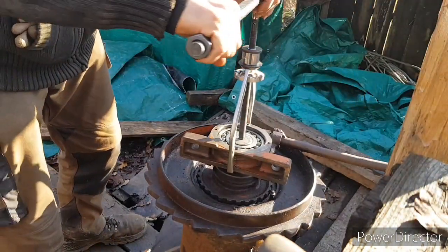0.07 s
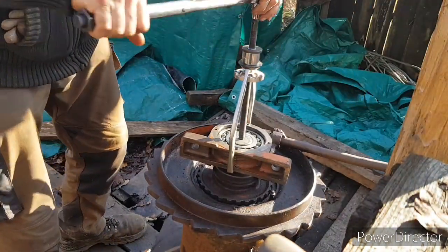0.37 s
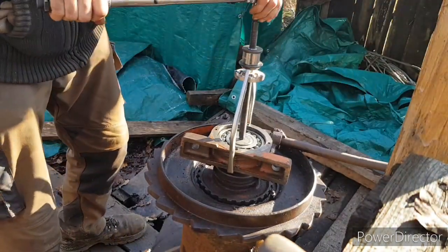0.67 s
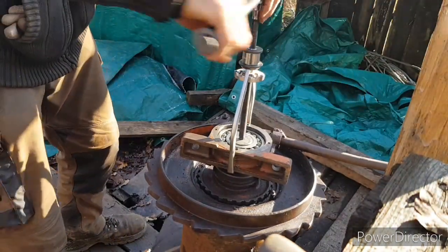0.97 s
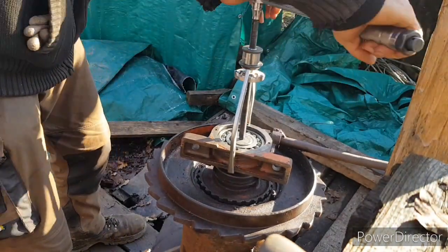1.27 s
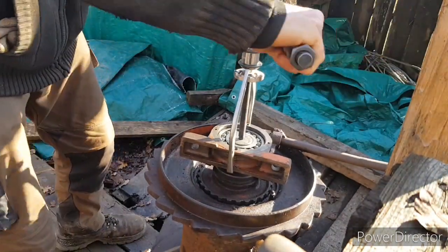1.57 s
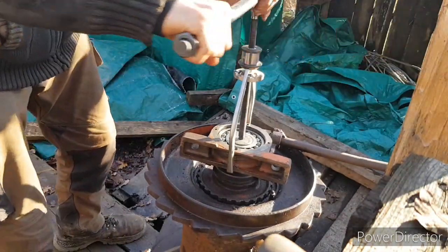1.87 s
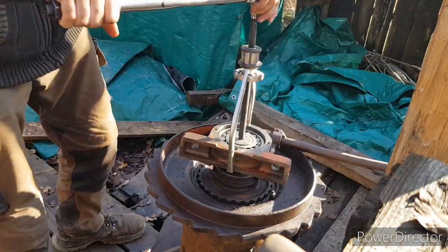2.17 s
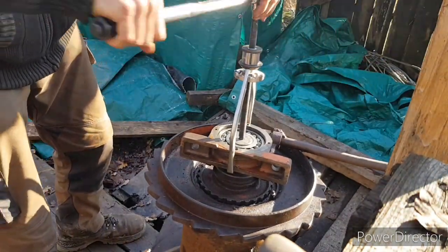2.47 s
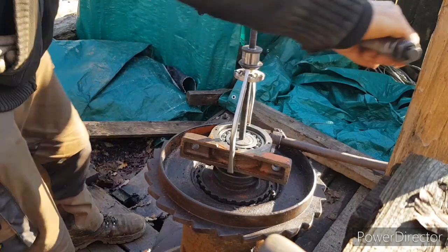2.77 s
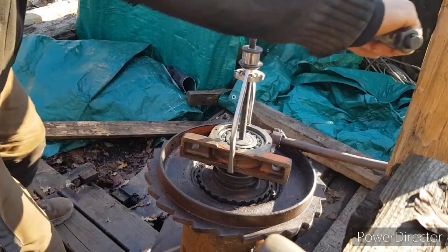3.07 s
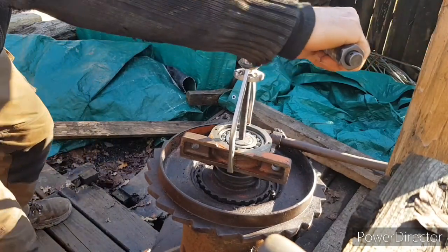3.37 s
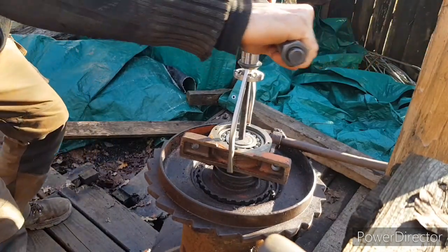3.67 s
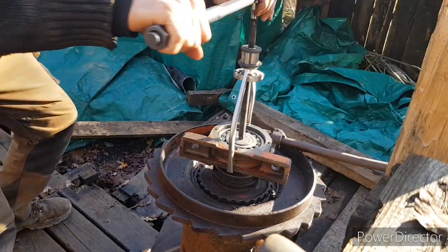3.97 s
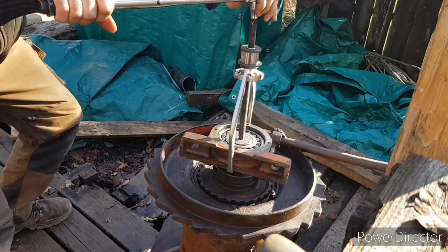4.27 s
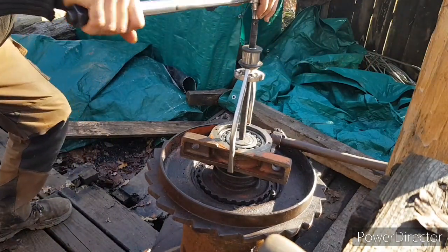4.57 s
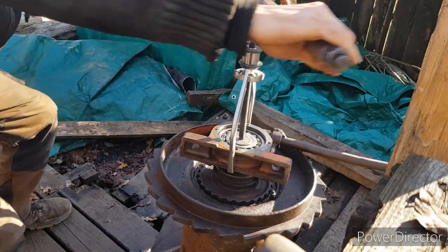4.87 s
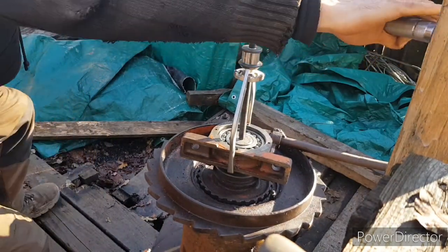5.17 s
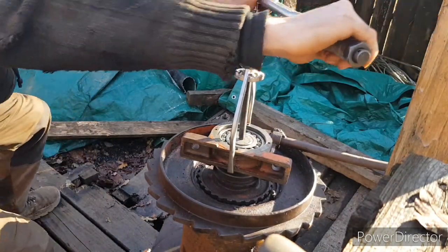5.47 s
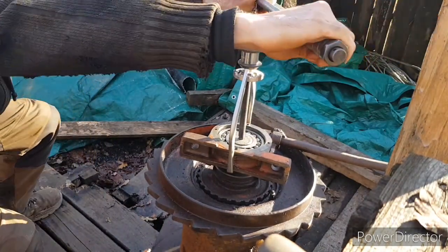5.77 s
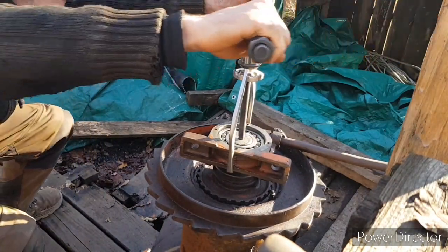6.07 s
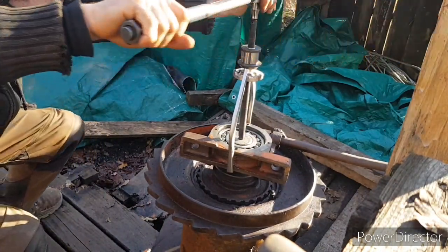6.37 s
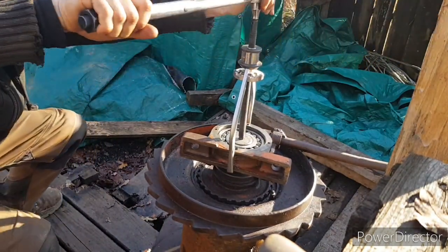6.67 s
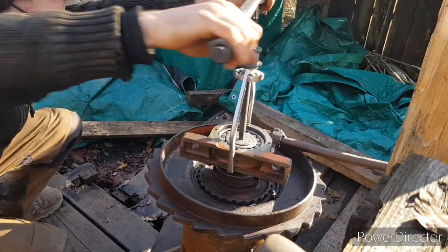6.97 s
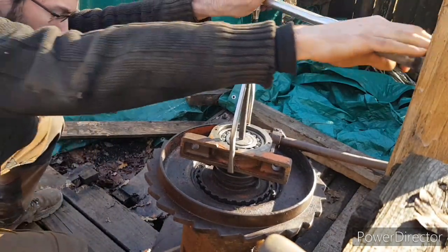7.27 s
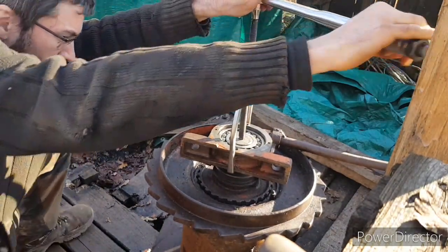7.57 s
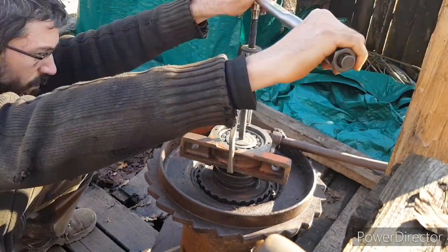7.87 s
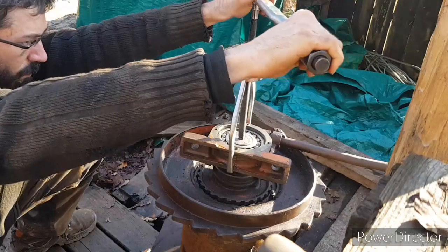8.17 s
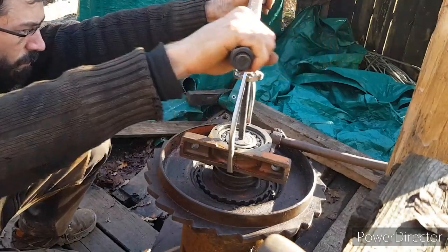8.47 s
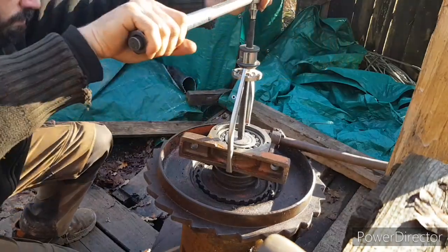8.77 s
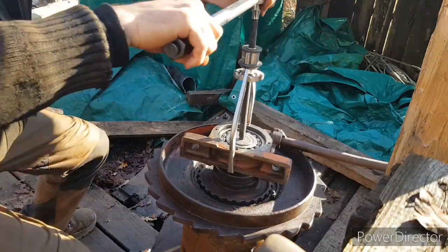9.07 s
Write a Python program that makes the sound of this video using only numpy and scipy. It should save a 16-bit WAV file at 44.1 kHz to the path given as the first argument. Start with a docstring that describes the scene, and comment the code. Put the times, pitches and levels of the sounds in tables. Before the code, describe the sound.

A long ratchet wrench turns a bearing puller on an iron wheel in a quiet yard. After a low thump on the plank deck, the wrench clicks sharply four times, then the wheel drops with a loud dull clunk, a rusty scrape and a soft ring. Three more bursts of clicks follow, about two seconds apart, among softer knocks, shoe scuffs and sleeve rustles. The sound is close and dry over a faint distant rumble.

```python
"""A long ratchet wrench turns a bearing puller on an iron wheel, on a plank deck in a fenced yard.
Over a faint far rumble, the wheel's rim sings softly, its stand thumps on the planks and boards tap.
Near 1 s slack steel ticks and the wrench swings back: its catch, the pawl, snaps over four teeth.
At 1.6 s the loaded wheel drops back with its loudest clunk, and rusty iron grates. Three more back
swings follow, near 2.6, 4.8 and 7.1 s, among softer knocks, scuffing shoes and rustling sleeves."""
import sys
import numpy as np
from scipy import signal
from scipy.fft import rfft, irfft, next_fast_len
from scipy.io import wavfile

SR = 44100
rng = np.random.default_rng(int(sys.argv[2]) if len(sys.argv) > 2 else 0)


def output_pcm(signal):
    """Save a mono or channel-first signal as 16-bit PCM at the path in sys.argv[1].

    Samples are clipped to [-1, 1] before scaling.
    """
    pcm = np.clip(np.atleast_2d(signal).T, -1, 1) * 32767
    wavfile.write(sys.argv[1], SR, np.round(pcm).astype(np.int16))


N = 401751


def undb(db):
    """Turn decibels into a number to multiply by."""
    return 10 ** (np.asarray(db) / 20)


def clock(seconds):
    """The time of each sample in a span."""
    return np.arange(int(seconds * SR)) / SR


def fade(t, t60):
    """Die away by 60 dB every t60 seconds (the fade time)."""
    return np.exp(-np.log(1000) * t / t60)


def unit(x, seconds):
    """Give a sound the energy of a steady level of 1 held for that long."""
    return x / np.sqrt(np.mean(np.sum(x ** 2, axis=-1)) / (seconds * SR))


def colour(x, points):
    """Shape the tone along (f/Hz, level/dB) points; the cepstrum step keeps it from sounding early."""
    size = 2 * next_fast_len(x.shape[-1] // 2 + 2048)
    hz, db = np.transpose(points)
    bin_hz = np.arange(size // 2 + 1) * SR / size
    curve_db = np.interp(np.log(bin_hz + 1), np.log(hz), db)
    cepstrum = irfft(np.log(undb(curve_db)))
    cepstrum[1:size // 2] *= 2
    cepstrum[size // 2 + 1:] = 0
    return irfft(rfft(x, size) * np.exp(rfft(cepstrum)))[..., :x.shape[-1]]


def low(x, hz, order=2):
    """Keep what lies below hz."""
    return signal.sosfilt(signal.butter(order, hz, fs=SR, output="sos"), x)


def high(x, hz, order=4):
    """Keep what lies above hz."""
    return signal.sosfilt(signal.butter(order, hz, "high", fs=SR, output="sos"), x)


def brighten(x, db):
    """Lift or lower everything above 8 kHz."""
    top = signal.sosfiltfilt(signal.butter(4, 8000, "high", fs=SR, output="sos"), x)
    return x + (undb(db) - 1) * top


def ring(notes, t, scatter_db, detune, spread):
    """A struck object's fading notes, mixed anew by each blow and a little out of step in each ear."""
    hz, db, t60 = np.transpose(notes)[:, :, None]
    size, tune, skew, travel = rng.standard_normal((4, len(notes), 1))
    loudness = undb(db + scatter_db * size) * fade(t, t60)
    phase = 2 * np.pi * (hz * (1 + detune * tune) * t + travel)
    return np.array([np.sum(loudness * np.sin(phase + side * spread * skew), axis=0) for side in (1, -1)])


def noise(count, width):
    """Stereo hiss; at width 0 both ears hear the same."""
    mid, side = rng.standard_normal((2, count))
    return np.array([mid + width * side, mid - width * side]) / np.hypot(1, width)


def pan(x, db):
    """Shift a sound to the left by db."""
    return x * undb(np.array([[db], [-db]]) / 2)


def add(out, s, x):
    """Mix a sound in at s seconds."""
    start = max(int(s * SR), 0)
    out[:, start:start + x.shape[1]] += x[:, :max(N - start, 0)]


# tone of the background: f/Hz, level/dB
AIR_TONE = [(12, -49.5), (20, -20), (46, -6.5), (65, -2), (110, -9), (228, -25.5), (301, -25), (337, -28),
            (434, -30), (718, -31.5), (976, -33.5), (2460, -35), (6720, -42), (14700, -38.5),
            (16000, -40.5)]
def air(level_db=-66, wander_db=-0.13):
    """A far rumble wavers very slightly, near the middle, under a smooth wide hiss."""
    mid, side = colour(rng.standard_normal((2, N)), AIR_TONE)
    side = colour(side, [(60, -12), (200, -5.5), (700, 0.5), (1500, 0.5)])
    wander = unit(low(rng.standard_normal(N), 5.9), N / SR)
    mid = mid + (undb(wander_db * wander) - 1) * low(mid, 300, order=1)
    return np.array([mid + side, mid - side]) * undb(level_db) / np.std(mid)


# the rim's two notes: f/Hz, fade time/s, wobble rate/Hz
RIM_NOTES = [(611, 2.6, 6.4), (666, 1.3, 10)]
def rim(opening_db=-71.5, clunk_db=-34.5, wobble=0.61, swing_pitch=1.022, detune=.007):
    """The rim sings at the start and at each snap and clunk; it is not quite round, so it wobbles."""
    out, t = np.zeros((2, N)), clock(2)
    snap_upper_db, clunk_upper_db = 4.5, 1.5  # hard snaps favour the upper note
    leaning = fade(t, 0.28)  # in a swing the wrench leans on the wheel: shorter, higher notes
    blows = [(0, opening_db, snap_upper_db, swing_pitch, leaning)]
    blows += [(s, db + clunk_db, clunk_upper_db, 1, 1) for s, db, _ in WHEEL_CLUNKS]
    for snaps, (_, _, rim_db) in zip(PAWL_SNAPS, BACK_SWINGS):
        for s, db, *_ in snaps:
            pitch = swing_pitch + detune * rng.standard_normal()
            blows.append((s, db + rim_db, snap_upper_db, pitch, leaning))
    rise = 1 - np.exp(-t / .02)  # the ring takes time to spread round the wheel
    notes = [(hz, rise * fade(t, t60) * (1 - wobble * np.cos(2 * np.pi * wobble_hz * t)))
             for hz, t60, wobble_hz in RIM_NOTES]
    for s, db, upper_db, pitch, damping in blows:
        lower, upper = (np.sin(2 * np.pi * hz * pitch * t) * shape for hz, shape in notes)
        song = (lower + undb(upper_db) * upper) * damping
        add(out, s, pan(unit(song, .1), 2) * undb(db))
    return out


# notes of the planks: f/Hz, level/dB, fade time/s
PLANK_NOTES = [(96.2, -7.5, 0.41), (130.6, -2, 0.2), (148.25, 0.5, 0.19), (203.8, -13, 0.26),
               (231.6, -2, 0.18), (254, -6, 0.077), (351.3, -11, .16), (449.4, -4.5, 0.1),
               (556.6, -6.5, .08), (700, -13.5, 0.042)]
# tone of rattling boards: f/Hz, level/dB
RATTLE_TONE = [(40, -27.5), (90, -8), (160, -1.5), (330, -5), (560, -3.5), (740, -4), (950, -12),
               (1500, -24), (12000, -51)]
# thumps on the deck: t/s, level/dB, muffled above f/Hz
DECK_THUMPS = [(0.0787, -32, 500), (.135, -46.5, 714), (1.615, -28.5, 448), (3.004, -57, 600),
               (3.098, -47.5, 700), (3.328, -39.5, 274), (3.378, -53.5, 350), (4.695, -39.5, 110),
               (5.624, -38, 293), (7.57, -43, 789), (7.789, -65, 600), (7.984, -40, 328), (9.025, -58, 299)]
def deck(rattle_db=-5, rattle_t60=0.28, gain_db=0.62):
    """The stand or a shoe lands on the planks; a softer landing leaves only the low notes."""
    out, t = np.zeros((2, N)), clock(.5)
    # the planks move most at first, while the load still presses
    push = (1 + undb(4) * fade(t, 0.042)) * (1 - np.exp(-t / 0.0011))
    for s, db, muffle_hz in DECK_THUMPS:
        planks = ring(PLANK_NOTES, t, scatter_db=-1.0, detune=0.0091, spread=0.15)
        rattle = colour(noise(len(t), width=0.27) * fade(t, rattle_t60), RATTLE_TONE)
        thump = low((unit(planks, 0.99) + undb(rattle_db) * unit(rattle, 1)) * push, muffle_hz)
        thump = high(thump, 85)  # the thumps carry hardly any deep bass
        add(out, s, unit(thump, .03) * undb(db + gain_db))
    return pan(out, 1.1)


# tone of a tap: f/Hz, level/dB
TAP_TONE = [(200, -9), (600, -1), (1200, -5.5), (2300, -0.5), (3100, -9), (4100, 1), (6000, -7.5),
            (14000, -30)]
# taps of boards and grit: t/s, level/dB, muffled above f/Hz
BOARD_TAPS = [(.082, -51, 1320), (0.132, -53, 2500), (.171, -57, 3100), (0.845, -60.5, 2980),
              (0.893, -60, 2530), (1.686, -46.5, 5030), (1.735, -55.5, 4020), (3.1, -53, 1530),
              (3.16, -60, 2260), (3.202, -66, 2230), (7.57, -40.5, 1010), (7.876, -64.5, 2400),
              (8.248, -50, 800), (8.709, -54, 2170)]
def taps(echo_db=-12, echo_t60=0.36, gain_db=-2):
    """Loose boards and grit tap dryly, each with a faint echo."""
    out, t = np.zeros((2, N)), clock(.2)
    shape = fade(t, .04) + undb(echo_db) * fade(t, echo_t60)
    for s, db, muffle_hz in BOARD_TAPS:
        burst = colour(noise(len(t), width=0.76) * shape, TAP_TONE)
        tap = low(burst, muffle_hz, order=3)
        add(out, s, unit(tap, .01) * undb(db + gain_db))
    return out


# tone of steel hitting steel: f/Hz, level/dB
STEEL_TONE = [(300, -41.5), (1100, -27.5), (1600, -22), (2300, -4.5), (3200, -5), (4100, -5.5), (5500, -5),
              (6800, -7), (8050, -17), (9400, -1.5), (12200, -2.5), (14200, -7.5), (16000, -24)]
# notes of the wrench's head: f/Hz, level/dB, fade time/s
HEAD_NOTES = [(2578, -6, .012), (3140, -1.5, 0.022), (3772, -5.5, 0.0092), (5020, -1, .014),
              (5880, 1, 0.012), (9440, -0.5, 0.014), (10670, 1.5, 0.012), (11830, -1, 0.014),
              (12100, 4, .01), (13500, -2, .007)]
SLIDE_S = .004  # the slide before each hit
def snap(treble_db, pan_db, sharp_db, ring_db=0, slide_t60=.005, crack_t60=.0105):
    """Steel slides, then hits steel: tiny bounces make a crack and the greased head rings briefly."""
    t = clock(.3) - SLIDE_S
    early = t[t < .03]
    before, after = np.maximum(-early, 0), np.maximum(early, 0)
    shape = fade(before, slide_t60) * fade(after, crack_t60)
    crack = colour(noise(len(early), width=0.92) * shape, STEEL_TONE)
    head = ring(HEAD_NOTES, after, scatter_db=3, detune=.012, spread=.7)
    head = high(head * (early > 0), 2000)
    direct = unit(crack, 1) + undb(ring_db) * unit(head, 1)
    hit = yard_echoes(np.maximum(t, 0))
    add(hit, 0, pan(unit(direct, 1), pan_db))
    # the way the steel lands shares the energy between dull body, sharp edge and treble
    body = signal.sosfiltfilt(signal.butter(6, 8000, fs=SR, output="sos"), hit)
    dull = signal.sosfiltfilt(signal.butter(6, 4300, fs=SR, output="sos"), body)
    edge, treble = body - dull, hit - body
    click = unit(dull, 1) + undb(sharp_db) * unit(edge, 1)
    return unit(click, .005) + undb(treble_db) * unit(treble, .005)


def yard_echoes(t, near_db=-6, near_t60=0.11, far_db=-18, far_t60=0.34):
    """A snap bounces back from deck, tarpaulin and fence, blurring into a short rasp on all sides."""
    near, far = colour(rng.standard_normal((2, 2, len(t))) * (t > .001), STEEL_TONE)
    near = undb(near_db) * unit(near * fade(t, near_t60), 1)
    far = undb(far_db) * unit(far * fade(t, far_t60), 0.79)
    return low(near + far, 13000, order=1)


# where the wrench's head is heard: f/Hz, left minus right level/dB
HEAD_SIDE = [(1800, 3.5), (2700, 0), (3600, -7), (5000, -7), (6600, -9), (8000, -4.5), (10000, 0),
             (12000, -5), (13200, -8.5)]
def at_wrench_head(x):
    """Place a sound at the head: most of its treble goes right, its lower part a little left."""
    return np.array([colour(channel, [(hz, side * db / 2) for hz, db in HEAD_SIDE])
                     for channel, side in zip(x, (1, -1))])


# ticks of slack steel: t/s, level/dB, treble/dB
JOINT_TICKS = [(0.847, -59, -10), (1.619, -50, -30), (2.488, -56.5, -7), (4.638, -48.5, 1.5),
               (5.99, -75.5, 9.5), (7.87, -66, -8), (8.299, -59.5, -9)]
def slack_joints(gain_db=-.5):
    """Loose steel joints tick with small snaps."""
    out = np.zeros((2, N))
    for s, db, treble_db in JOINT_TICKS:
        add(out, s - SLIDE_S, snap(treble_db, pan_db=1.5, sharp_db=-3) * undb(db + gain_db))
    return at_wrench_head(out)


# notes of the iron wheel and puller: f/Hz, level/dB, fade time/s
IRON_NOTES = [(385.7, -17, 0.17), (467, 2, 0.16), (578.7, -19.5, .14), (622, -2.5, 0.18), (695.3, -3, .15),
              (816, -7.5, .22), (897.5, -19.5, 0.29), (921, -5, 0.18), (975, -10, .15), (1060, -22, 0.42),
              (1130, -15, 0.19), (1195, -13.5, .17), (1390, -19, 0.093), (1405, -22, .14),
              (1610, -25.5, 0.1774), (1783, -16.5, .15)]
# clunks of the wheel: t/s, level/dB, muffled above f/Hz
WHEEL_CLUNKS = [(0.856, -66, 500), (1.286, -52.5, 410), (1.623, -24.5, 1240), (3.476, -59, 173),
                (5.764, -61.5, 170), (7.258, -55, 444), (8.244, -51, 457)]
def wheel(rattle_db=-8, rattle_t60=0.27, gain_db=1.5, rise_s=0.0016):
    """The wheel shifts on its stand with a dull clunk that shakes the boards under it."""
    out, t = np.zeros((2, N)), clock(.4)
    rise = 1 - np.exp(-t / rise_s)
    for s, db, muffle_hz in WHEEL_CLUNKS:
        iron = ring(IRON_NOTES, t, scatter_db=1.5, detune=0.0017, spread=0.2)
        rattle = colour(noise(len(t), width=.5) * fade(t, rattle_t60), RATTLE_TONE)
        clunk = low((unit(iron, 1) + undb(rattle_db) * unit(rattle, 0.73)) * rise, muffle_hz)
        add(out, s, unit(high(clunk, 260, order=2), .03) * undb(db + gain_db))
    return pan(out, 3.2)


# snaps of the pawl, one list per back swing: t/s, level/dB, treble/dB, sharpness/dB
PAWL_SNAPS = [
    [(0.9953, -30, 3.4, -3), (1.0669, -29.5, 1.9, -2), (1.139, -28.5, 1.5, -8), (1.2192, -30, 1.5, -1.5)],
    [(2.6384, -32.5, 4, -2.5), (2.7123, -31, 7, 3.5), (2.789, -35.5, 6.5, 0.5), (2.8852, -33.5, 2.9, 3)],
    [(4.804, -25.5, -4, 0), (4.8893, -27.5, -1.3, -0.2), (4.9787, -30.0, 1.5, -0.6),
     (5.0995, -30.5, 3.5, 0)],
    [(7.076, -32, -0.7, 5.5), (7.1805, -31, 0.5, -0.7), (7.3089, -30.5, -2.2, 3.5)],
]
# back swings: left minus right/dB, tip tick/dB, rim ring/dB (the last two add to a snap's level)
BACK_SWINGS = [(0, -21, -46), (-1.5, -24, -49), (0.5, -19.5, -44), (-1, -20, -39)]
def ratchet(gain_db=0.53, first_tooth_s=.083, lead_share=.115, tip_scatter_db=2):
    """The pawl ticks on the tip of each tooth, then drops into the gap, later when the swing is slow."""
    out = np.zeros((2, N))
    for snaps, (pan_db, tip_db, _) in zip(PAWL_SNAPS, BACK_SWINGS):
        previous = snaps[0][0] - first_tooth_s
        for s, db, treble_db, sharp_db in snaps:
            lead_s = lead_share * (s - previous)
            previous = s
            tip_gain = undb(db + tip_db + tip_scatter_db * rng.standard_normal())
            add(out, s - SLIDE_S - lead_s, snap(treble_db, pan_db, sharp_db) * tip_gain)
            add(out, s - SLIDE_S, snap(treble_db, pan_db, sharp_db, ring_db=2) * undb(db + gain_db))
    return at_wrench_head(out)


# tone of grating rust: f/Hz, level/dB
RUST_TONE = [(300, -13.5), (1100, 2.5), (2200, 1), (3100, -5.5), (4500, -6.5), (7000, -14.5), (8200, -45),
             (10000, -7), (13000, -13), (16000, -28)]
def grind(at_s=1.617, db=-40, rise_s=0.002, t60=0.19):
    """Rusty iron grates on iron as the wheel drops back hardest."""
    out, t = np.zeros((2, N)), clock(.4)
    catches = undb(2.99 * unit(low(rng.standard_normal(len(t)), 300), 0.19))
    shape = fade(t, t60) * (1 - np.exp(-t / rise_s))
    crunch = colour(noise(len(t), width=0.74) * catches * shape, RUST_TONE)
    add(out, at_s, unit(crunch, 0.036) * undb(db))
    return out


# tone of rubbing soles and cloth: f/Hz, level/dB
RUB_TONE = [(150, -5.5), (500, 5), (1000, -4.5), (2200, 5), (4000, 0), (6300, 3), (8000, -13.5),
            (10000, 0.5), (12500, -1), (15500, -14)]
def rub(count, grain_db=1.5):
    """Two surfaces rub in tiny uneven catches."""
    catches = unit(low(rng.standard_normal(count), 180), count / SR)
    grainy_hiss = noise(count, width=0.96) * undb(grain_db * catches)
    return unit(colour(grainy_hiss, RUB_TONE), count / SR)


# shoes on the planks: t/s at full speed, length/s, level/dB, treble/dB
SHOE_SCUFFS = [(2.975, 0.039, -61.5, 4), (3.138, 0.068, -56, 0.5), (4.697, 0.036, -47, 6.5),
               (7.52, 0.041, -46.5, 3.5)]
def scuffs(gain_db=-1, rise_s=0.03, stop_t60=.2, dulling_db_per_s=89):
    """A sole gathers speed, grows duller as it slides, then comes to rest."""
    out, t = np.zeros((2, N)), clock(.5) - .1
    rise = np.exp(-2 * (np.minimum(t, 0) / rise_s) ** 2)
    for s, length, db, treble_db in SHOE_SCUFFS:
        speed = rise * fade(np.maximum(t - length, 0), stop_t60)
        slide = brighten(rub(len(t)), treble_db - dulling_db_per_s * np.clip(t, 0, length))
        add(out, s + t[0], slide * speed * undb(db + gain_db))
    return out


# sleeves and trousers: t/s at the middle, length/s, level/dB, treble/dB
CLOTH_RUSTLES = [(3.55, 0.37, -81, 5), (4.602, 0.14, -74.5, 6.5), (4.759, 0.13, -57, -0.5),
                 (5.189, 0.19, -60.5, 0), (5.549, 0.32, -73.5, -1.5), (7.419, 0.34, -65.5, 2),
                 (7.759, 0.35, -70.5, 0.5), (9.1, 0.24, -70, 3)]
def rustles(gain_db=-1):
    """Rubbing cloth swells and fades evenly with each move of the body."""
    out, t = np.zeros((2, N)), clock(0.96) - .5
    for s, length, db, treble_db in CLOTH_RUSTLES:
        swell = np.exp(-2 * (t / length) ** 2)
        add(out, s + t[0], brighten(rub(len(t)), treble_db) * swell * undb(db + gain_db))
    return out


def scene():
    """Mix all the sounds of the yard."""
    background = pan(air(), 0.62)
    work = rim() + deck() + taps() + slack_joints() + wheel() + ratchet() + grind()
    worker = pan(scuffs() + rustles(), -1.4)
    return background + work + worker


def record(dry, top_hz=15500):
    """Cut away the very highest treble."""
    return signal.sosfilt(signal.ellip(8, .2, 70, top_hz, fs=SR, output="sos"), dry)


dry = scene()
out = record(dry)
output_pcm(out)
```